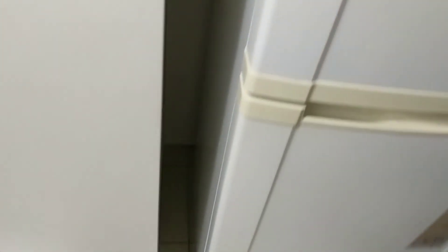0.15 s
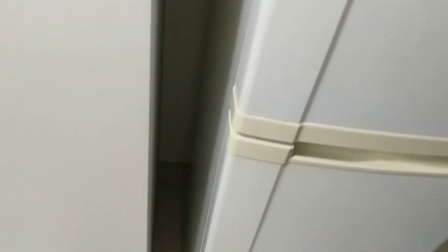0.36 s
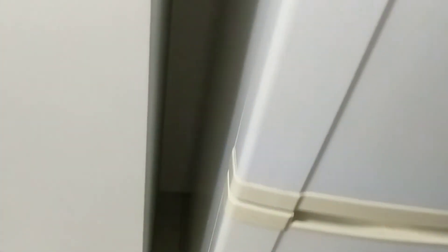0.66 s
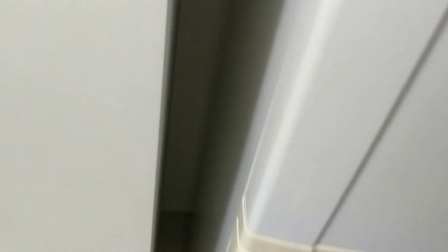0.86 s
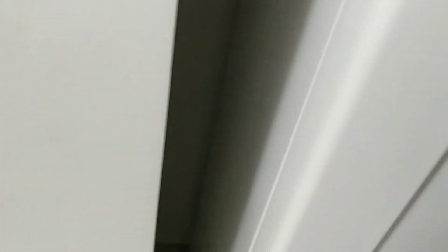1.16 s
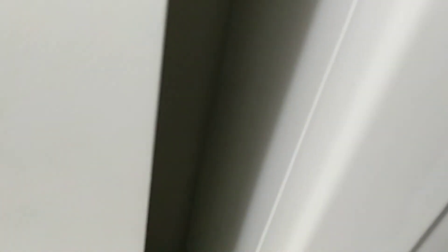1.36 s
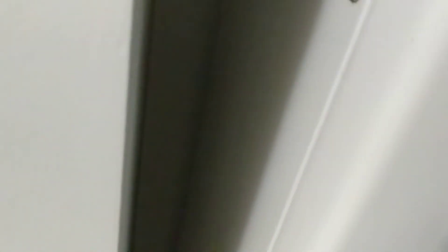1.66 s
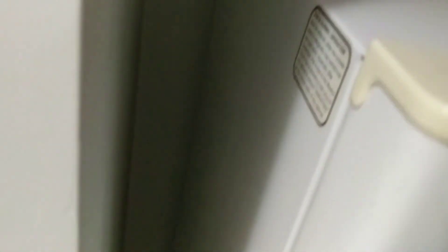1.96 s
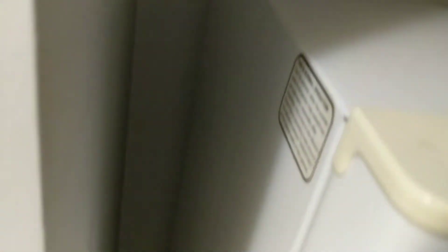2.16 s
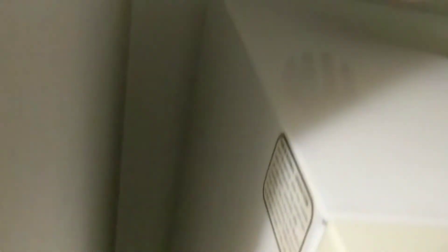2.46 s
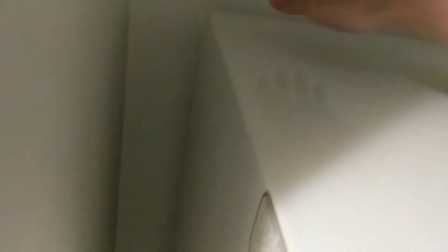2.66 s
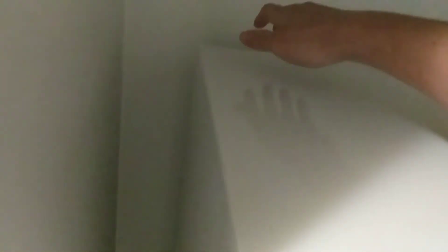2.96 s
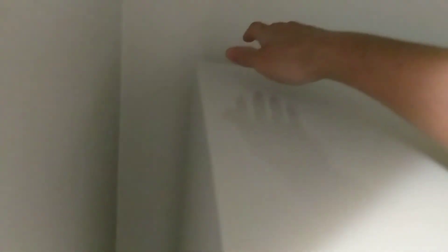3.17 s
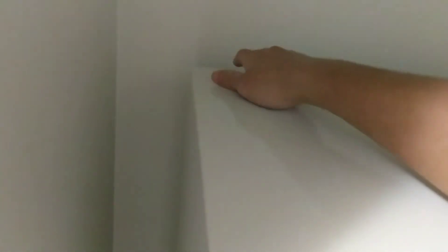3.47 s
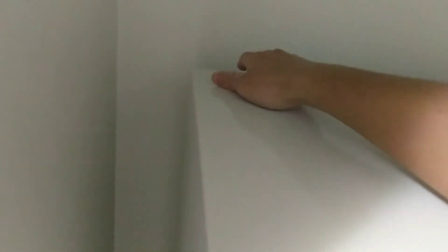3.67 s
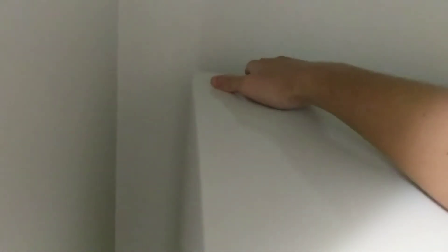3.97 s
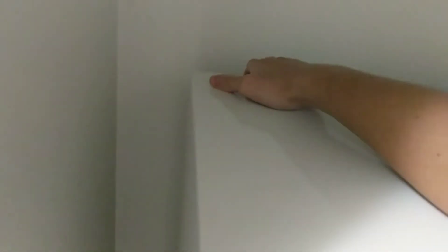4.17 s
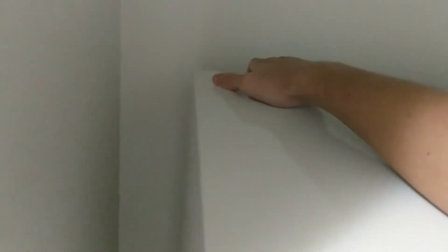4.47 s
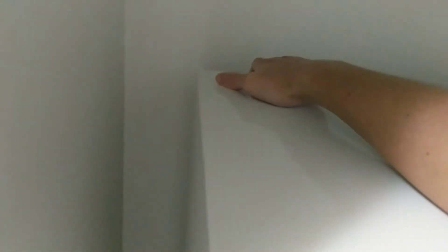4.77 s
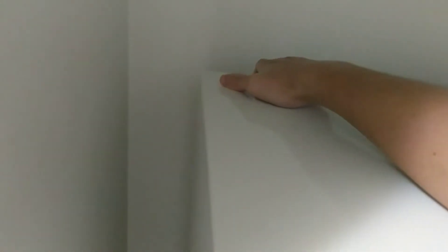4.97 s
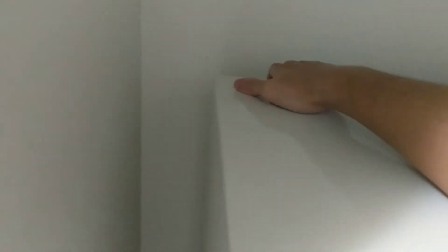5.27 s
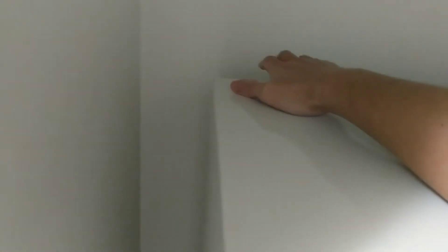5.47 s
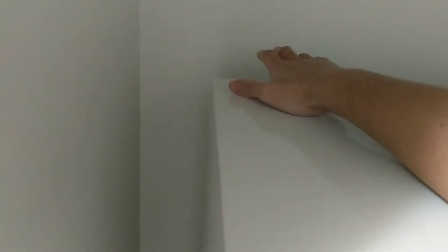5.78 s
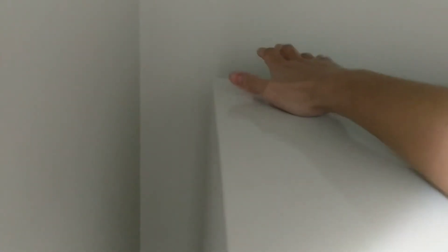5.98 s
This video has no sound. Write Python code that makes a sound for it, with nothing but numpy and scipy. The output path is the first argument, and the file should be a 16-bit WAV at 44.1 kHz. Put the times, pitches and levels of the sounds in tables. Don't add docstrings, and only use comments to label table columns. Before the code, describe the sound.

In a small indoor kitchen, a refrigerator compressor drones continuously with a low hum and nasal buzz. A handheld microphone moves from door to top, so it gets louder and its tone shifts. Small clicks come early, then faint, quick metallic taps. Late on, as a hand eases off the top, loose sheet metal rattles hard, calms briefly, and rattles again.

```python
import sys
import numpy as np
from scipy import signal
from scipy.fft import rfft, irfft, next_fast_len
from scipy.io import wavfile
from scipy.ndimage import uniform_filter1d

SR = 44100
rng = np.random.default_rng(int(sys.argv[2]) if len(sys.argv) > 2 else 0)


def persist_wave(psi):
    counts = np.round(np.clip(psi, -1, 1) * 32767).astype(np.int16)
    wavfile.write(sys.argv[1], SR, np.atleast_2d(counts).T)


def gain_from_decibels(decibels):
    exponent = np.asarray(decibels, float) / 20
    return 10 ** exponent


N = 269451
SLOW_STEP = 40
BUZZ_DB, HUM_DB, HISS_DB = -50.5, -59.5, -67.5
HUM_FOLLOWS, HISS_FOLLOWS = 0.67, 0.69


def in_time(rows):
    s, *columns = np.transpose(rows)
    return [np.interp(np.arange(N) / SR, s, c) for c in columns]


def at_hz(points, hz):
    points = np.array(points)
    return np.interp(np.log(hz), np.log(points[:, 0]), points[:, 1])


def rms_one(x):
    return x / np.sqrt(np.mean(x ** 2) + 1e-20)


def drift(rate_hz):
    r = np.exp(-2 * np.pi * SLOW_STEP * rate_hz / SR)
    settled = signal.lfilter([1], [1, -2 * r, r * r], rng.standard_normal(N // SLOW_STEP + 2001))[2000:]
    return rms_one(settled)


def flicker(depth_db, rate_hz):
    slow = gain_from_decibels(depth_db * drift(rate_hz))
    return np.interp(np.arange(N) / SLOW_STEP, np.arange(len(slow)), slow)


def colour(x, spectrum):
    size = next_fast_len(N)
    hz = np.maximum(np.fft.rfftfreq(size, 1 / SR), 10)
    return irfft(rfft(x, size) * gain_from_decibels(at_hz(spectrum, hz)), size)[:N]


def band(x, low_hz, high_hz):
    return signal.sosfilt(signal.butter(2, [low_hz, high_hz], "band", fs=SR, output="sos"), x)


def resonance(x, hz, width_hz):
    r = np.exp(-np.pi * width_hz / SR)
    poles = [1, -2 * r * np.cos(2 * np.pi * hz / SR), r * r]
    return signal.lfilter([(1 - r * r) / 2, 0, (r * r - 1) / 2], poles, x + 1e-18)


def evened(x):
    return x / np.sqrt(uniform_filter1d(x ** 2, size=SR // 4) + 1e-20)


def steadied(x, share, size):
    local_power = uniform_filter1d(x ** 2, size=size) + 1e-20
    return x * (np.mean(x ** 2) / local_power) ** (share / 2)


# freq_hz [Hz], level_db [dB]
AIR = [(30, -24), (41, -10.5), (200, -14), (300, -13.5), (440, -20), (550, -32), (950, -20), (1550, -24),
       (1760, -34), (2350, -23), (3400, -30.5), (6000, -35.5), (9000, -40.5), (16000, -41)]
# freq_hz [Hz], width_hz [Hz], level_db [dB]
WHISTLES = [(6500, 44, 1), (6700, 40, -20), (7870, 85, -3), (8550, 35, -15), (9980, 69, -6),
            (10750, 100, -7), (11620, 90, 0), (13400, 120, -4), (14900, 320, -20)]


def air(hiss_db, turns, whistle_db):
    noise = colour(rng.standard_normal(N), AIR)
    noise = noise / np.std(band(noise, 10280, 14000))
    top = band(noise, 1600, 20000)
    whistles = 0
    for hz, width_hz, db in WHISTLES:
        whistles += gain_from_decibels(db + whistle_db) * flicker(1.7, 0.55) * resonance(top, hz, width_hz)
    throb = 1 + 0.24 * np.sin(2 * np.pi * turns)
    return gain_from_decibels(hiss_db - 4.5) * (gain_from_decibels(-2.5) * (noise - top) + throb * (top + whistles))


# freq_hz [Hz], level_db [dB under the deep hum]
TONES = [(82, -12.5), (100, -33), (163, -7.5), (200, -9.5), (326, -9.5)]


def tones(hum_db):
    t = np.arange(N) / SR
    out = 0
    for hz, db in TONES:
        tone = np.sqrt(2) * np.sin(2 * np.pi * (hz * t + rng.random()))
        out += gain_from_decibels(db) * flicker(0.7, 5.2) * tone
    return gain_from_decibels(hum_db) * out


# start_s [s], peak_db [dB], low_hz, the dullest part [Hz]
CLICKS = [
    (.402, -46, 5870),
    (0.767, -45, 9000),
    (0.778, -45, 9000),
    (0.972, -35.5, 1600),
    (0.976, -35, 3470),
    (1.508, -42, 8900),
    (1.52, -44, 8900),
    (1.532, -48, 8900),
]
# freq_hz [Hz], width_hz [Hz], level_db [dB]
CLICK_RINGS = [(2690, 19, -8), (3840, 70, -7), (4480, 33, -4), (4820, 18, -3), (4960, 62, -8),
               (5490, 77, -1), (6960, 93, -13), (7300, 59, -11)]
# freq_hz [Hz], density_db [dB per Hz]
CLICK_TONE = [(800, -11), (1800, 3.5), (2400, 0), (3600, -3), (4900, -1.5), (6000, -8.5), (9500, -19),
              (12600, -17), (16000, -23)]


def clicks(room_db, t60):
    t = np.arange(N) / SR
    noise = rms_one(colour(rng.standard_normal(N), CLICK_TONE))
    rings = sum(gain_from_decibels(db) * resonance(noise, hz, width_hz) for hz, width_hz, db in CLICK_RINGS)
    snap = noise + gain_from_decibels(15.5) * rings
    out = np.zeros(N)
    for s, peak_db, low_hz in CLICKS:
        age = np.clip(t - s, 0, 1)
        direct = snap * gain_from_decibels(-60 * age / 0.035)
        tail = noise * gain_from_decibels(room_db - 60 * age / t60)
        sound = np.minimum(age / 0.0014, 1) * (direct + tail)
        out += gain_from_decibels(peak_db - 6.5) * band(sound, low_hz, 15000)
    return out


ROCK_S, ROCK_EVERY_S = 1.59, .1185
TAP_DB, TAP_GROWS_DB_PER_S, TAP_SCATTER_DB, WEAK_PAIR_DB = -43, 2, .7, -6


def light_taps(count):
    since = np.arange(count) * ROCK_EVERY_S
    weak = (np.arange(count) + 1) % 4 < 2
    scatter_db = TAP_SCATTER_DB * rng.standard_normal(count)
    out = np.zeros(N)
    at = ((ROCK_S + since) * SR).astype(int)
    out[at] = gain_from_decibels(TAP_DB + TAP_GROWS_DB_PER_S * since + scatter_db + WEAK_PAIR_DB * weak)
    return out


def bounces(per_s):
    sizes = gain_from_decibels(5.3 * np.minimum(rng.exponential(1, N), 3)) * rng.choice([-1, 1], N)
    return rms_one(sizes * (rng.random(N) < per_s / SR))


# freq_hz [Hz], width_hz [Hz], level_db [dB]
SHEET = [(494.8, 10.5, -9.5), (677, 146, -20.5), (785.6, 7.7, -7), (842, 8.1, -21), (887.7, 11.3, -5),
         (907, 18, -8.5), (972, 9.3, -3.5), (1077, 13, -13), (1170, 16, -12.5), (1433, 17.5, -4),
         (1505, 7.8, 0.5), (1522, 8.4, 2.5), (1585, 14, -3.5), (1886, 16, -6.5), (1982, 6.8, -7),
         (2144, 13, -12), (2210, 18, -14), (2375, 44, -14.5), (2720, 26, -11), (3020, 150, -18.5),
         (3106, 18, -17), (3213, 28, -23), (3756, 19, -11.5), (4275, 59, -18), (5390, 100, -27),
         (5920, 18, -19), (6120, 69, -37), (6610, 350, -34.5), (7270, 170, -33)]
# start_s [s], peak_db [dB], brightness_db [dB], length_s [s]
KNOCKS = [(4.401, -26.5, -22, 0.013), (4.45, -30.5, -24, 0.036), (4.519, -31.5, -19, 0.031),
          (4.58, -31, -29, 0.014), (4.624, -37, -26, 0.026), (4.649, -31.5, -17, 0.032),
          (4.698, -23.5, -17, 0.019), (4.74, -21, -17, 0.016), (4.782, -26, -15, 0.016),
          (4.8225, -21.5, -14.5, 0.013), (4.865, -27, -16, 0.014), (4.884, -31, -15, 0.018),
          (4.912, -33, -19, 0.015), (4.941, -27, -10.5, 0.021), (4.984, -28, -23, 0.025),
          (5.007, -26.5, -13, 0.021), (5.0654, -24.5, -14.5, 0.021), (5.126, -25, -23.5, 0.025),
          (5.184, -35, -35, 0.011), (5.2135, -36, -22, 0.013), (5.28, -45, -24, 0.012),
          (5.299, -32, -17, 0.018), (5.44, -41, -25, 0.015), (5.456, -29, -19, 0.022),
          (5.517, -30, -23, 0.016), (5.546, -36, -26, 0.012), (5.58, -38, -30, 0.012),
          (5.601, -26, -19, 0.02), (5.669, -33, -25, 0.02), (5.742, -21.5, -17.5, 0.019),
          (5.78, -29, -26, 0.012), (5.8035, -20.5, -13.5, 0.018), (5.8636, -22, -15.5, 0.02),
          (5.9, -29, -19, 0.013), (5.925, -21, -15.5, 0.023), (5.9897, -18.5, -22, 0.013),
          (5.969, -32, -21, 0.015), (6.037, -27, -23, 0.015), (6.055, -28, -22, 0.014)]
# time_s [s], level_db [dB]
LOOSE = [(0, -53.5), (2.3, -55.5), (4.1, -45.5), (4.18, -46), (4.36, -60), (4.42, -44.5), (4.61, -29.5),
         (4.74, -31.5), (4.8, -29.5), (5.0, -30), (5.16, -37.5), (5.3, -41), (5.4, -44.5), (5.57, -42),
         (5.63, -43), (5.67, -37), (5.86, -35.5), (6.11, -37)]
UPPER_CHATTER_DB, UPPER_FOLLOWS = -50, 1.076
RING_S = 0.0074
STEADINESS, MODE_STEADINESS = 0.48, .85
KNOCK_RISE_S, LIFT_S = 0.0038, 0.0082
LIFT_SHARE, LIFT_MUTES = 0.69, .5


def sheet(turns, taps):
    dull, bright, lifted = np.zeros((3, N + 4000))
    age = np.arange(4000) / SR
    for s, peak_db, bright_db, length_s in KNOCKS:
        at = round((s - .002) * SR)
        burst = gain_from_decibels(peak_db) * np.minimum(age / KNOCK_RISE_S, 1) * np.exp(-(age / length_s) ** 4)
        dull[at:at + 4000] += burst
        bright[at:at + 4000] += burst * gain_from_decibels(bright_db + 14.5)
        lifted[at - round(LIFT_S * SR):at] = np.clip(LIFT_SHARE * gain_from_decibels(peak_db + 20.5), 0, .9)
    dull, bright, lifted = dull[:N], bright[:N], lifted[:N]

    loose_db, = in_time(LOOSE)
    gate = 0.32 + 0.62 * np.sin(np.pi * (turns - .1)) ** 2
    gate = gate * (1 - uniform_filter1d(lifted, size=90))
    swing = gain_from_decibels(loose_db) * gate
    rasp = gain_from_decibels(UPPER_CHATTER_DB + UPPER_FOLLOWS * (loose_db + 40)) * gate

    contacts = bounces(per_s=9000)
    out = gain_from_decibels(-41) * band((bright + gain_from_decibels(19) * rasp) * contacts, 4400, 12400)
    groups = np.array([gain_from_decibels(-11.5) * band(contacts, 640, 1670),
                       gain_from_decibels(-13.5) * band(contacts, 1300, 2400),
                       gain_from_decibels(-10) * band(contacts, 2560, 6500)])
    for k, (hz, width_hz, db) in enumerate(SHEET):
        sign = (-1) ** k
        mode = steadied(resonance(contacts, hz, width_hz), MODE_STEADINESS, size=1600)
        groups[(hz > 1100) + (hz > 2500)] += gain_from_decibels(db + 20) * sign * mode
        if 900 < hz < 2500:
            out += gain_from_decibels(db + 33) * sign * resonance(taps, hz, width_hz)

    drives = [gain_from_decibels(-20.5) * dull + gain_from_decibels(-3.5) * swing,
              gain_from_decibels(-9.5) * dull + gain_from_decibels(5) * rasp,
              gain_from_decibels(-17) * bright + gain_from_decibels(-6) * rasp]
    fade = np.exp(-1 / (RING_S * SR))
    muting = 1 - LIFT_MUTES * uniform_filter1d(lifted, size=200)
    for ringing, drive in zip(groups, drives):
        envelope = signal.lfilter([1 - fade], [1, -fade], drive)
        out += steadied(rms_one(ringing), STEADINESS, size=400) * envelope * muting
    return out


# freq_hz [Hz], width_hz [Hz], level_db [dB]
UPPER = [(4140, 82, -13), (4310, 160, -7.5), (4696, 21, -6), (5020, 90, -9.5), (5440, 250, -12),
         (6840, 89, -14.5), (7800, 57, -28), (8030, 69, -15.5), (8500, 40, -25)]


def valves(turns, buzz_db, place):
    where = turns % 1 * 900
    bursts = rng.standard_normal((5, 900)) * (0.67 + np.exp(-np.arange(900) / 300))
    blow = 0
    for k, burst in enumerate(bursts):
        share = np.sqrt(np.clip(1 - abs(place - k), 0, 1))
        blow += share * np.interp(where, np.arange(900), burst, period=900)
    rings = 0
    for hz, width_hz, db in UPPER:
        ring = evened(resonance(blow, hz, width_hz)) * np.sqrt(width_hz)
        rings += gain_from_decibels(db) * flicker(1.2, 1) * ring
    return gain_from_decibels(buzz_db - 10 + 0.52 * np.minimum(place, 3)) * rms_one(rings)


# multiple [1], level_db [dB], gain_db, door to top [dB]
DEEP = [(2, -8.5, 4), (3, -19.5, 18), (4, -14.5, 16), (5, -11.5, 4), (6, -5.5, 4.5), (7, -27, -8.5),
        (8, -28.5, -14), (9, -28, 2), (10, -13.5, -5.5)]
# level_db [dB], gain_db, door to top [dB],
# echo [share 0-1], nodes crossed on the way [count], first node [cycles]
BUZZ = [(-0.4, 0, 0.13, 1.87, 0.92), (-2, -1, 0.02, 1.31, 0.24), (-7, -14, 0.66, 0.33, 0.083),
        (-18, -13.5, 0.56, 0.77, 0.52), (-1.5, 4.5, 0.51, 1.11, 0.026), (-1, 10, 0.32, 1.9, 0.38),
        (-9.5, 2, 0.95, 0.98, 0.19), (-6.5, 0, 0.72, 1.07, 0.43), (8.5, 8, 0.78, 0.683, 0.59),
        (-1.5, -6.5, 0.83, 1.33, 0.055), (6.5, 20.5, 0.96, 0.375, 0.369), (-15.5, -20.5, 1, 2.31, 0.91),
        (-11.5, -14, 0.26, 3.2, 0.058), (-10.5, -7, 0.32, 2.53, 0.23), (1.3, -2.5, 0.62, 1.198, 0.17),
        (-2, -6.5, 0.54, 2.42, 0.13), (2.5, 4.5, 0.3, 2.375, 0.47), (-3.5, -6.5, 0.53, 1.13, 0.25),
        (3.5, 20, 0.44, 1.635, 0.39), (-10.5, -4, 0, 0.53, 1), (4, 5.5, 0.36, 2.61, 0.54),
        (-9, 8, 0.2, 0.6, 0.77), (-1.4, 11, 0.62, 1.43, 0.76), (-6.5, 20, 0.25, 1.64, 0.45),
        (-12, -3, 0.46, 1.4, 0.31), (-16.5, 3, 0.2, 1.7, 0.97), (-31, 8, 0.8, 0.46, 0.23),
        (-20.5, -16, 0.35, 3.95, 0.79), (-11, -15.5, 0.56, 1.6, 0.98), (-21.5, -12.5, 0.6, 2.75, 0.27),
        (-16, -7, 0.74, 1.24, 1), (-22, -13.5, 0.74, 2.55, 0.94), (-18, -1, 0.6, 2.25, 0.99),
        (-11, 2, 0.8, 0.31, 0.15), (-10, 11, 0.42, 2.58, 0.77)]
# level_db [dB], gain_db [dB], echo [share 0-1], nodes [count], first node [cycles]
WHINE = [(-14.5, -5, 0.48, 0.93, 0.61), (-19.5, -1, 0.14, 1.7, 0.21), (-8.5, 2.5, 0.33, 0.93, 0.11),
         (-12, -3.5, 0.29, 2.22, 0.011), (-30.5, -17.5, 0.51, 2.75, 0.95), (-21.5, 2, 0.61, 2.53, 0.52),
         (-23.5, -1, 0.99, 1.14, 0.53), (-21.5, 2, 0.18, 4.4, 0.64), (-19.5, -4, 1, 2.44, 0.26),
         (-20, -2, 0.25, 1.4, 0.15), (-21, 1, 0.41, 2.8, 0.63), (-27, -7, 0.27, 3.8, 0.81),
         (-45, 4, 0.19, 2.5, 0.33), (-13, 13, 0.37, 2.05, 0.96), (-28.5, 5, 0.45, 2, 0.84),
         (-37, 1, 0.36, 0.68, 1), (-25.5, -13, 0.68, 1.3, 0.27), (-14.5, 5.5, 0.55, 2.24, 0.85),
         (-14.5, 10, 0.32, 2.1, 0.85), (-24.5, 13, 0.69, 0.72, 0.8), (-19.5, 5, 1, 0.49, 0.32),
         (-44, 3, 1, 2.8, 0.94), (-41, -11, 0.4, 2.3, 0.52), (-40, 5, 0.33, 3.4, 0.22),
         (-55, -11, 0.27, 3.7, 0.32), (-39, -5, 0.61, 1.1, 0.6), (-30, -7, 0.52, 2.55, 0.74),
         (-41, -11.3, 0.55, 2.3, 0.47), (-28, -11.5, 0.22, 4.6, 0.31), (-22.5, 1, 0.35, 4.27, 0.31),
         (-25, -9, 0.39, 0.48, 0.27), (-17, 20, 0.8, 0.33, 0.26), (-22.5, 3, 0.85, 1.32, 0.63),
         (-21.5, 9, 0.49, 2.7, 0.19), (-34, 4, 0.81, 2, 0.65), (-31, -9.9, 0.37, 2.9, 0.097)]
# freq_hz [Hz], change_db [dB]
HAND_OFF = [(300, -0.5), (520, -3.5), (760, -4.5), (880, 7), (930, -2.5), (980, 1.5), (1200, 2.5),
            (1350, -4), (1600, -5.5), (1900, -0.5), (2400, -3), (3500, -1.5)]
# multiple [1], change_db [dB]
JOLTED = [(19, 3), (20, 2), (27, -1.5), (28, -12), (29, -12), (30, -5), (32, 17), (33, 1.5), (39, -10),
          (40, 8)]
EASE_HUM_DB = -1.5
JOLT_S, JOLT_DB = .08, -49
SLOW_WANDER = .3
SWAY_TURNS, SHAKEN_TURNS = 0.063, 0.092
RATTLE_SHAKES = 1.57


def compressor(turns, way, near_db, ease, taps, wander_db, slant, smear):
    rows = [(db, gain_db, 0, 0, 0) for multiple, db, gain_db in DEEP] + list(BUZZ) + list(WHINE)
    count = len(rows) + 2
    phases = -np.pi * slant * np.arange(count) ** 2 + smear * rng.standard_normal(count)
    coarse, fine = np.arange(0, N, SLOW_STEP), np.arange(0, N, 5)
    climbed, near, eased = way[coarse], near_db[coarse], ease[coarse]
    shaken = eased * (1 + RATTLE_SHAKES * gain_from_decibels(in_time(LOOSE)[0][coarse] + 31.5))
    shaft_hz = SHAFT[-1][1]

    gains = [gain_from_decibels(HUM_DB + HUM_FOLLOWS * near + EASE_HUM_DB * eased)]
    for k, (db, gain_db, echo, nodes, first) in enumerate(rows, 2):
        wave = 1 - np.clip(echo, 0, 1) * np.exp(2j * np.pi * (nodes * climbed - first))
        hand_db = eased * at_hz(HAND_OFF, k * shaft_hz)
        gains.append(wave * gain_from_decibels(BUZZ_DB + db + near + gain_db * (climbed - 1) + hand_db))

    touch = signal.fftconvolve(taps, np.hanning(round(JOLT_S * SR)))[coarse]
    jolt = np.tanh(touch / gain_from_decibels(JOLT_DB) / 3)
    jolted_db = dict(JOLTED)
    out = 0
    for k, gain in enumerate(gains, 1):
        gain = gain * (1 - (k > 40) * jolt * np.exp(1.1j * rng.standard_normal()))
        gain = gain * gain_from_decibels(jolted_db.get(k, 0) * jolt)
        wander = SLOW_WANDER * drift(2.0) + 0.77 * drift(12.2)
        gain = gain * gain_from_decibels(wander_db * min(k / 15, 1) * wander)
        sway = SWAY_TURNS * drift(0.51) + SHAKEN_TURNS * shaken * drift(9.5)
        slip = min((k - 1) / 15, 1) * sway + np.unwrap(np.angle(gain)) / (2 * np.pi)
        cycles = k * turns[fine] + np.interp(fine, coarse, slip)
        level = np.interp(fine, coarse, abs(gain)) * np.sqrt(2)
        out += level * np.sin(2 * np.pi * cycles + phases[k])
    return signal.resample_poly(out, 5, 1)[:N]


# time_s [s], way from door to top [share 0-1], nearness_db to the compressor [dB]
PATH = [(0, 0.02, -9), (.5, 0.11, -7), (1, 0.22, -5), (1.5, 0.36, -3), (2, 0.45, -2), (2.5, 0.65, -1.5),
        (3, 0.84, 0), (3.5, 0.98, 1), (4.3, 0.96, 0), (5.2, 0.95, 0.5), (6.11, 1, 0)]
# time_s [s], speed_hz [Hz]
SHAFT = [
    (0, 48.9),
    (1.8, 48.89),
    (2.4, 48.84),
    (6.11, 48.85),
]
EASE_S, EASE_TAKES_S = 4.37, 0.07


def scene():
    way, near_db = in_time(PATH)
    turns = np.cumsum(in_time(SHAFT)[0]) / SR
    ease = np.clip((np.arange(N) / SR - EASE_S) / EASE_TAKES_S, 0, 1)
    place = 3 * np.clip(way, 0, 1) + ease
    taps = light_taps(count=22)
    mix = air(HISS_DB + HISS_FOLLOWS * near_db + 0.48 * ease, turns, whistle_db=-3.5 + 11.3 * way - 6.6 * ease)
    mix = mix + tones(HUM_DB + HUM_FOLLOWS * near_db - 0.5)
    mix = mix + clicks(room_db=-5.5, t60=0.39)
    mix = mix + sheet(turns, taps)
    mix = mix + valves(turns, -55 + near_db - 3 * ease, place)
    mix = mix + compressor(turns, way, near_db, ease, taps, wander_db=1.9, slant=.06, smear=.5)
    return mix[None]


def roll_off(x):
    return signal.sosfilt(signal.butter(12, 15725, fs=SR, output="sos"), x)


def record(dry):
    mix = signal.sosfilt(signal.butter(4, 36, "high", fs=SR, output="sos"), dry)
    return roll_off(mix)


dry = scene()
out = record(dry)
persist_wave(out)
```